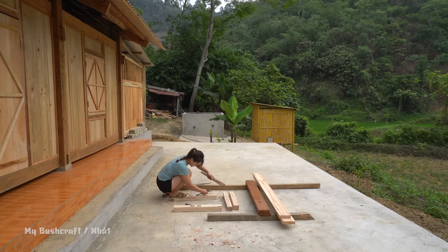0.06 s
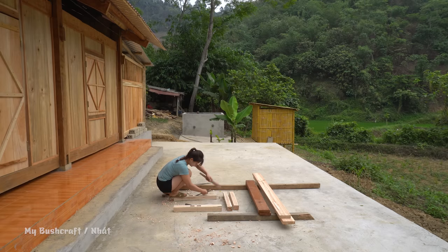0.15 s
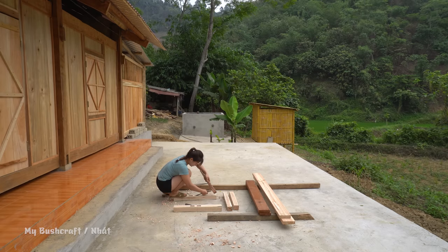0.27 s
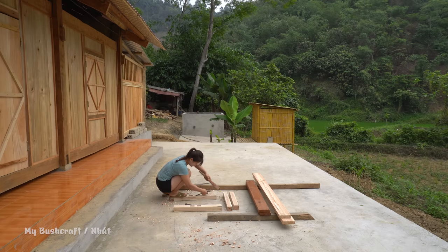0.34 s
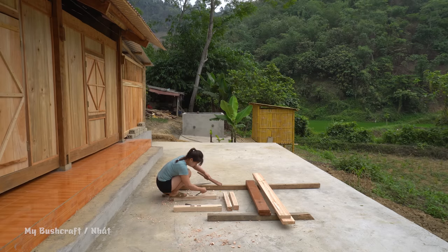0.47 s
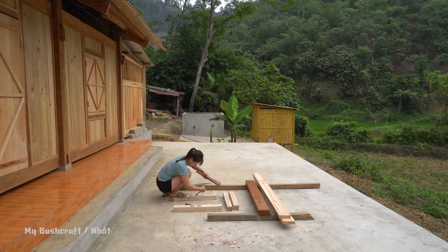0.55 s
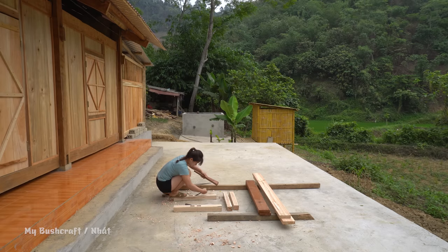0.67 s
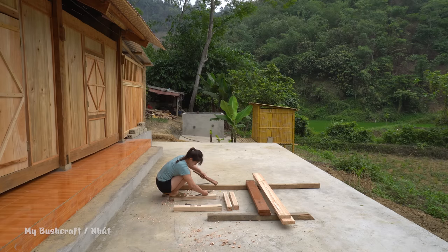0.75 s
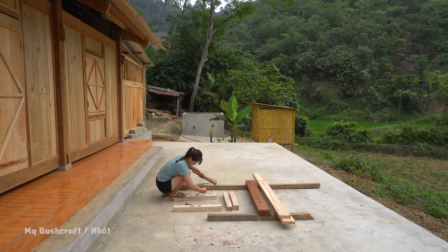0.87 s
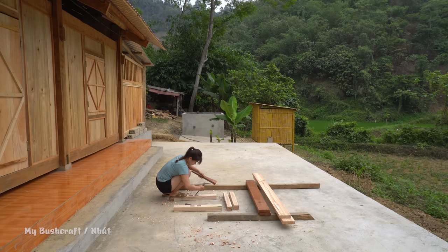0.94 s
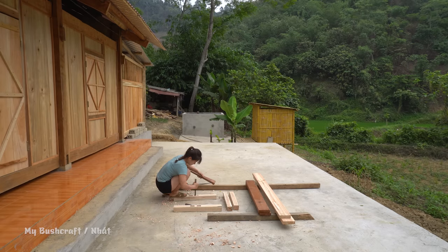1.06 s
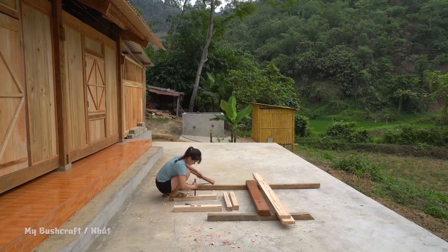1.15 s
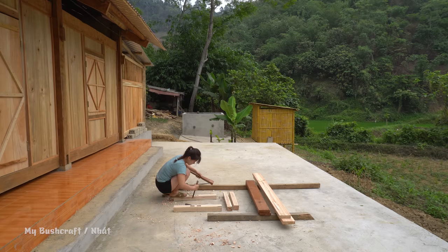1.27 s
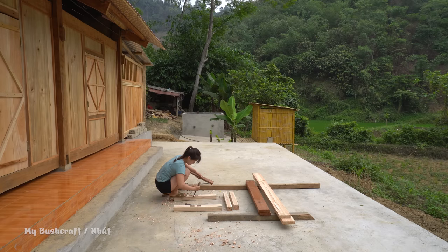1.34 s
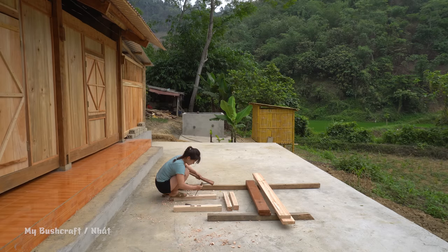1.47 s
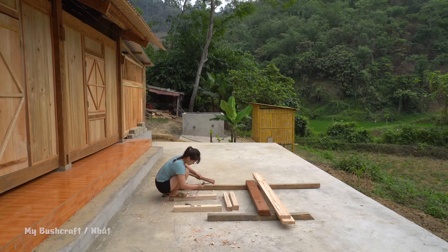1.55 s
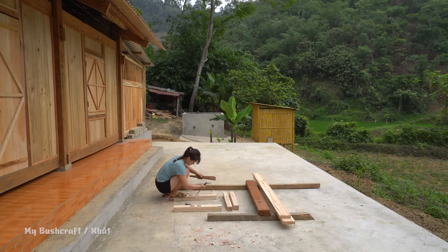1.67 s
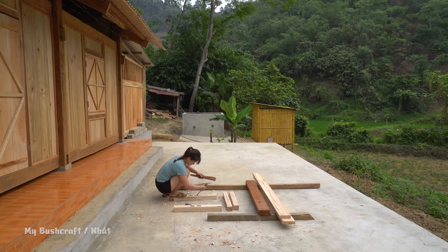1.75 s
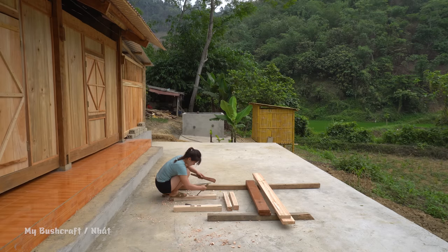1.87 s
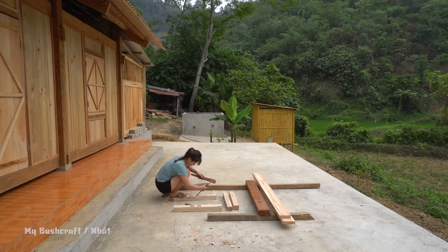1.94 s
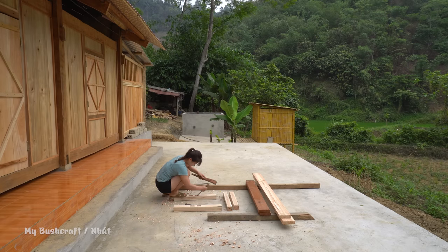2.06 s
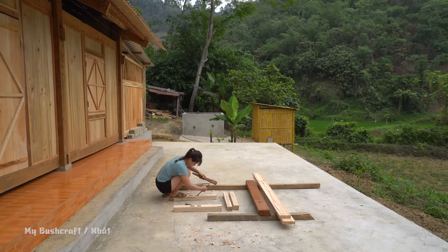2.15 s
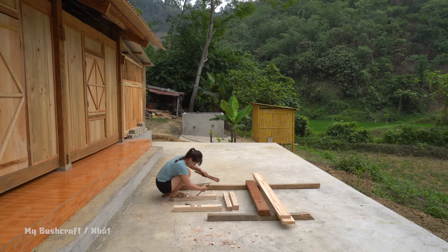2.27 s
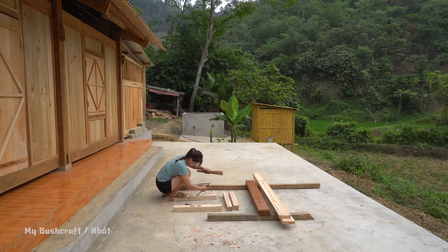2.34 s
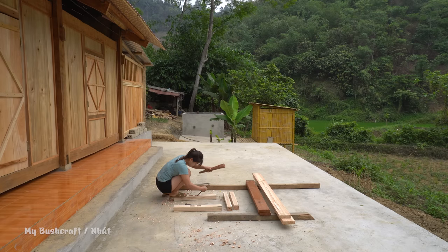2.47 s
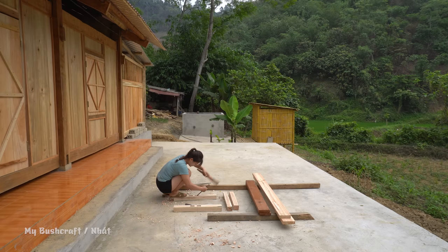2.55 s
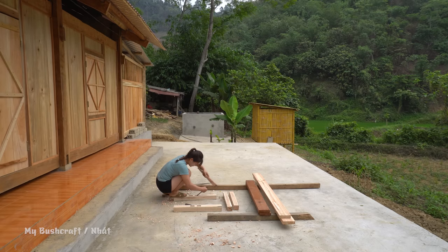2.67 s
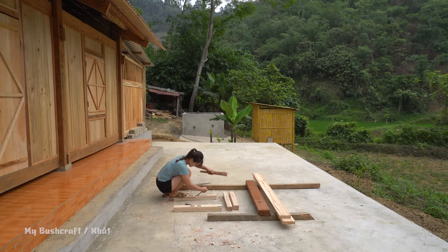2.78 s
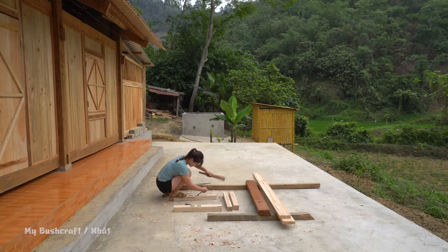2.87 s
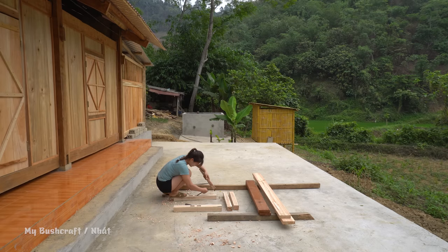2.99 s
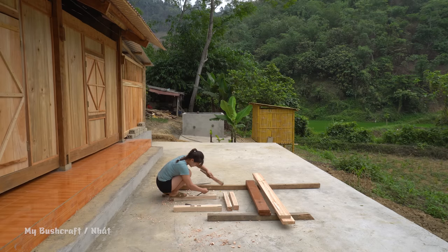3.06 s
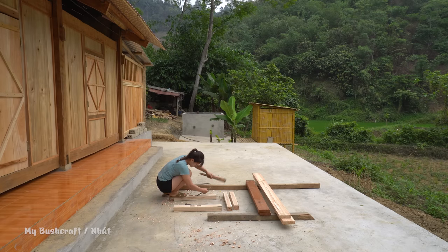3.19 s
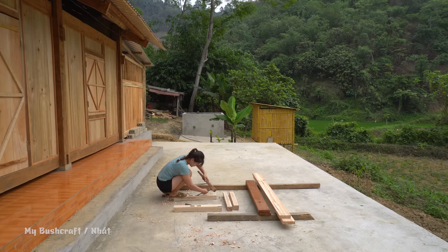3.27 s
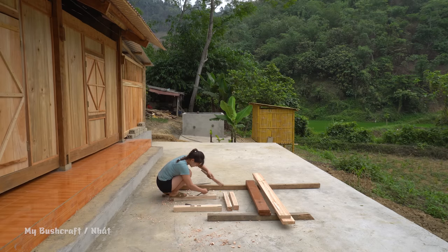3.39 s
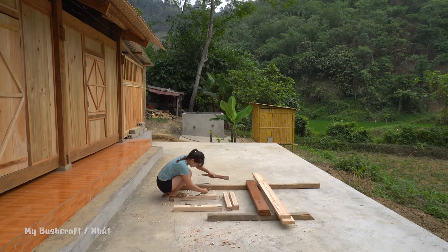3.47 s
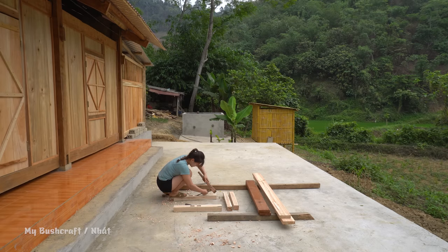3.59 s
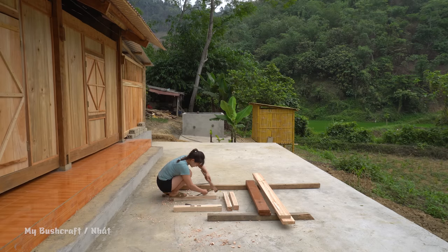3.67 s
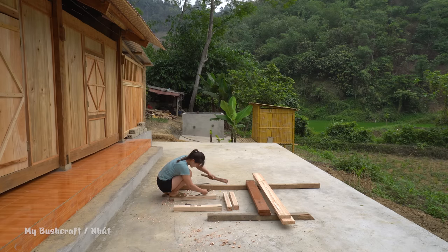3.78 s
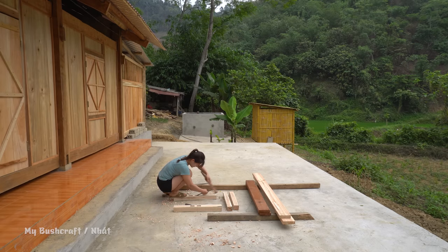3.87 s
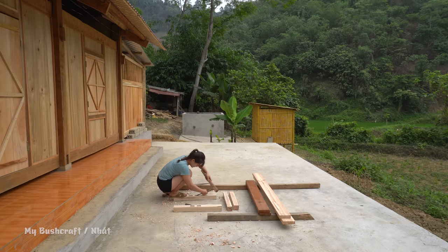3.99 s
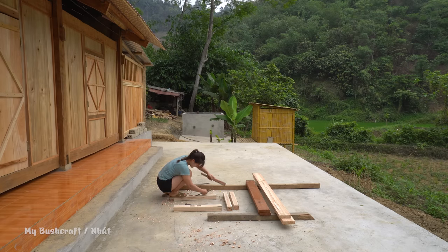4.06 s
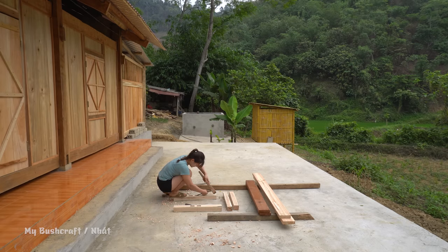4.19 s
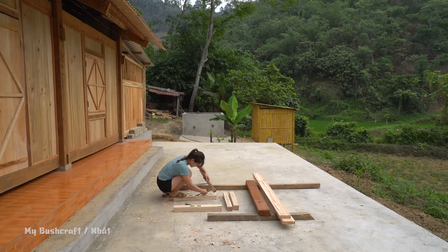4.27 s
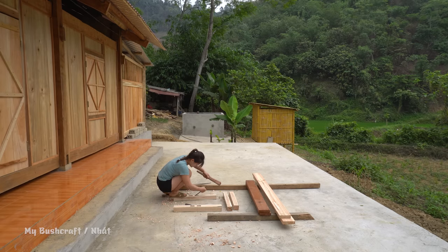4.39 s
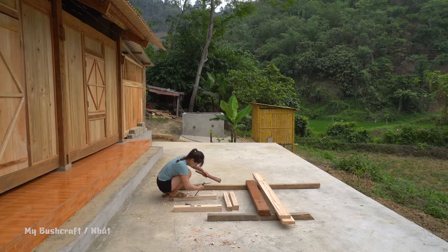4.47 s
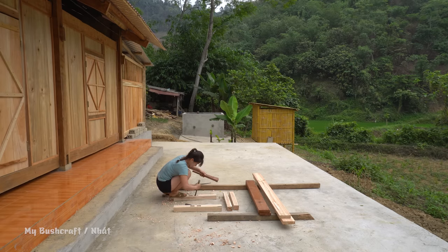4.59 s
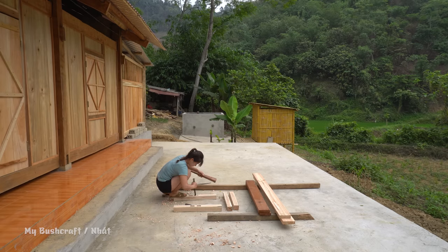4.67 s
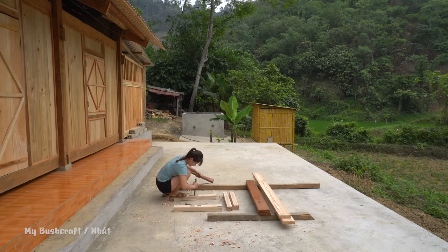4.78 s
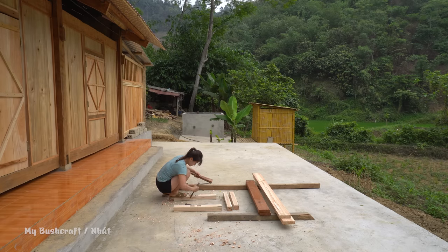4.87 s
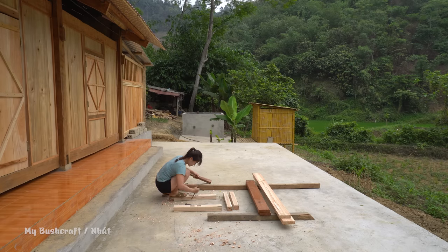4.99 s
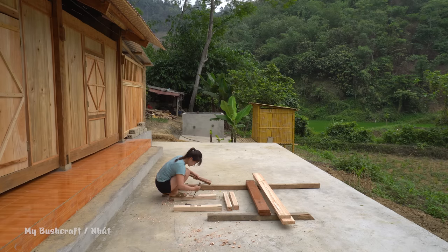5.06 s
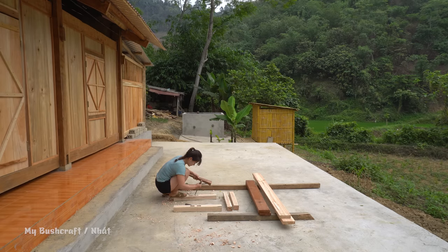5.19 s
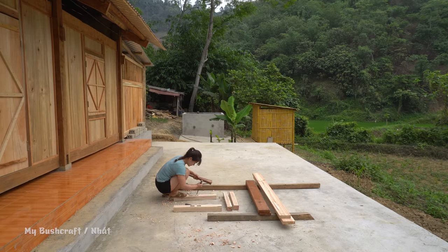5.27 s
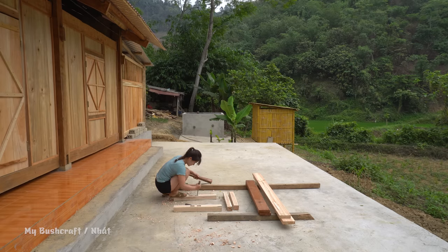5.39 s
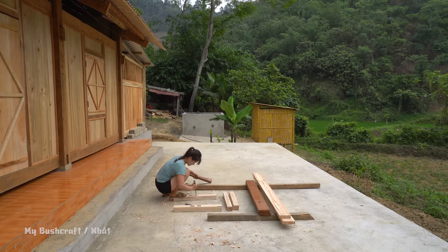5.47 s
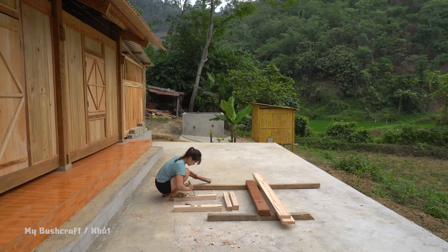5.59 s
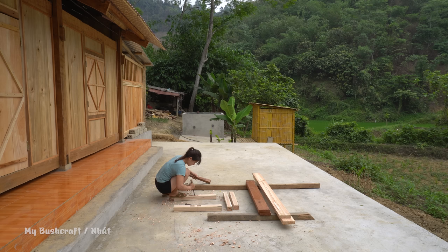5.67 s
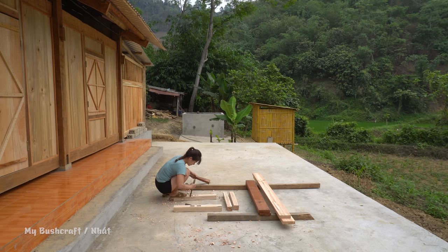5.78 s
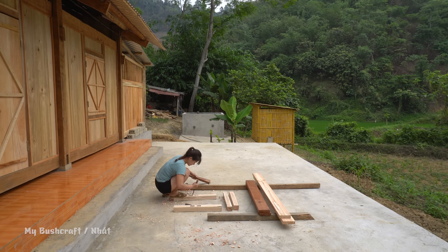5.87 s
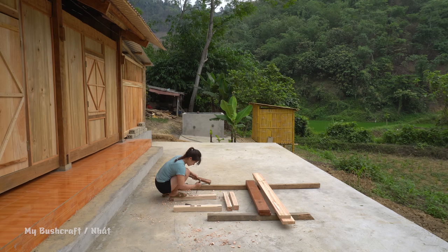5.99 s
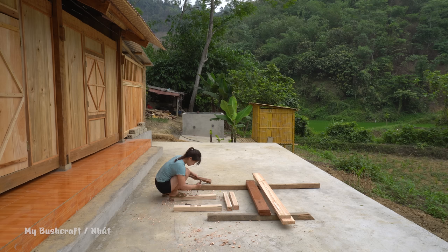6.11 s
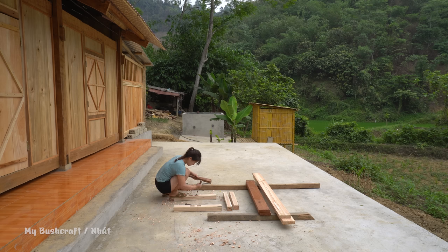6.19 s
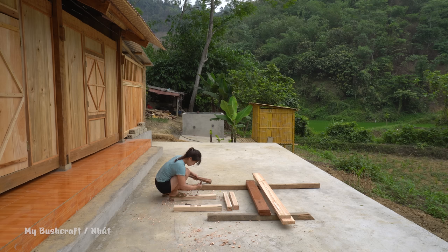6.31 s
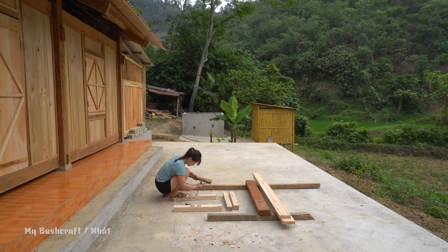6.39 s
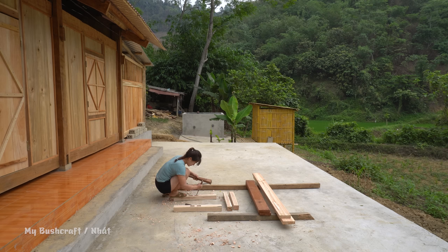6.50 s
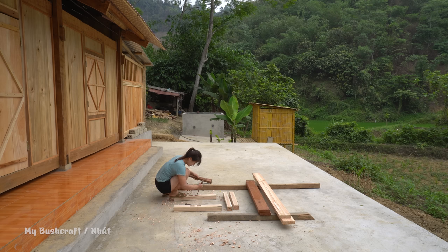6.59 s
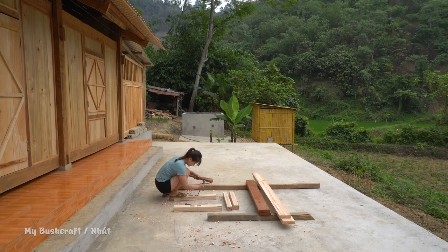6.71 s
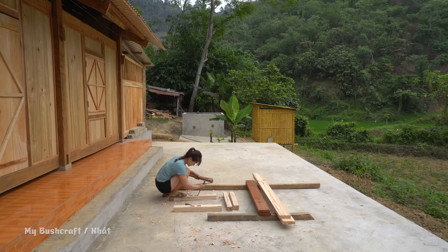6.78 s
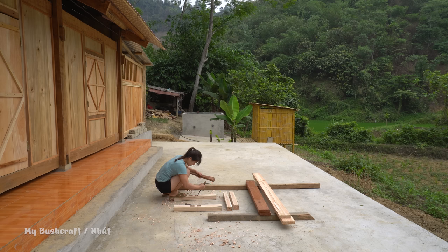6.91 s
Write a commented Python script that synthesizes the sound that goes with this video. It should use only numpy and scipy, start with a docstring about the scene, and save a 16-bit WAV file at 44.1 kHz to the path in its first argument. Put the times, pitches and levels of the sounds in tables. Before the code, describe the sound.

Sharp woody chisel blows, bright and short with little low thump, ring out beside a timber house. A pair comes first, then after more than two seconds an even run of six, each with a quick wall slap and soft valley tail. Between and after are tiny dry scrapes and dull taps of wood. A high cicada rasp, insect chorus, light breeze and thin bird calls fill the open air, picked up in stereo from a distance.

```python
"""A wooden mallet drives a chisel into a beam on a concrete yard beside a timber house.
Each blow excites decaying modes and a noisy crack; house front, far wall and wooded valley answer.
A cicada's click trains ring its drum over a distant insect chorus and rumbling breeze of shaped noise.
Soft knocks and scrapes are filtered bursts; small birds call in gliding, quavering sines."""
import sys
import numpy as np
from scipy import signal
from scipy.fft import rfft, irfft
from scipy.io import wavfile
from scipy.ndimage import uniform_filter1d

SR = 44100
rng = np.random.default_rng(int(sys.argv[2]) if len(sys.argv) > 2 else 0)


def store_pcm(level_fs):
    """Save levels as 16-bit WAV."""
    pcm = np.round(np.clip(level_fs, -1, 1) * 32767).astype(np.int16)
    wavfile.write(sys.argv[1], SR, np.atleast_2d(pcm).T)


N = 306054
TIME = np.arange(N) / SR  # seconds

# All levels in dB are relative; spectra give shape only.
# Mallet blows. Each row: start in seconds, force in dB, boost of the low modes in dB,
# crack level in dB, factor on the modal frequencies.
BLOWS = [(-.0145, -0.5, 0.5, -1, 0.98), (0.286, -2.5, -3, 4.5, 0.94), (2.672, -2.3, -4.5, 4, 0.92),
         (3.0201, -2, 4, 5, 0.99), (3.3418, -.5, -0.5, -1.5, 0.94), (3.6663, -1.5, 1, 3, 1.0),
         (3.9834, -1, -3.5, -0.5, 0.84), (4.2732, -0.5, -0.5, -1.5, 1)]
# Modes of beam, chisel and mallet. Each row: nominal frequency in Hz, level in dB, 60 dB decay time in s.
MODES = [(171, -21, 0.017), (372, -19.5, 0.025), (440, -11.5, 0.024), (492, -4.5, 0.027), (600, -8, 0.027),
         (706, -6.5, 0.024), (840, -7, 0.03), (1140, -3.5, 0.017), (1269, -0.5, 0.0032), (1453, -0.5, 0.01),
         (1612, -4, 0.054), (1817, -1.5, 0.018), (2082, -1.5, 0.022), (2396, -4, 0.0021),
         (2592, -0.5, 0.0099), (3076, 0.5, 0.014), (3900, -8, 0.011), (4540, -34, .006),
         (5780, -22.5, .006)]
# Spectrum of the edge splitting fibres. Each row: frequency in Hz, density in dB per Hz.
CRACK = [(250, -44), (900, 6.5), (2400, 5.5), (3500, -7), (5500, -1.5), (7300, -8), (8500, -6),
         (11000, -15), (16000, -17)]
# Left-right likeness of direct sound. Each row: frequency in Hz, likeness from 0 to 1.
DIRECT_LIKENESS = [(100, .99), (600, 1), (1400, 0.68), (3000, 1), (7000, 0.52), (15000, 0.7)]
CUT_S = 0.0052  # how long the edge travels in one blow
THUMP_HZ = 706  # the beam's thump lies below this frequency

# Single reflections from slab and house front. Each row: delay in s, left level in dB, right level in dB.
REFLECTIONS = [(.0093, -22, -20), (0.0216, -24, -19), (.0245, -25, -36), (0.038, -40, -24)]
# Frequency response of the far wall's echo. Each row: frequency in Hz, gain in dB.
WALL = [(200, -5.5), (1400, -46), (2000, -10.5), (2600, -4.5), (3500, -16.5), (6000, -11.5), (15000, -17)]
# Frequency response of the valley's tail. Each row: frequency in Hz, gain in dB.
VALLEY = [(150, -17), (300, 2), (500, -3.5), (900, -3), (1600, -6), (3000, -16.5), (6000, -22), (15000, 7)]
# Decay of the valley's tail. Each row: frequency in Hz, 60 dB decay time in s.
VALLEY_T60 = [(150, 0.9), (500, 0.88), (1500, 0.79), (4000, 0.36), (12000, 0.11)]

# Clicks of the cicada's ribs buckling in one muscle stroke.
# Each row: delay in ms, level in dB, left minus right in dB.
RIBS = [(0.839, -2.1, -0.9), (2.167, -8.9, -0.0), (4.354, -6.0, -2.0), (5.577, -3.4, -1.3),
        (6.918, -17.9, 5.6), (9.067, -6.1, -1.5), (10.299, -21.2, -4.7), (11.958, -22.7, 4.7),
        (13.825, -17.6, -4.5)]
# Resonance of the cicada's drum and belly. Each row: frequency in Hz, gain in dB.
TYMBAL = [(1500.0, -46.5), (2200.0, -36.5), (2550.0, -9), (2800.0, 1.5), (3100.0, -6.5), (3400.0, 4.5),
          (3700.0, -7), (4100.0, -15), (4800.0, -21), (5600.0, -32), (8000.0, -57.5)]
FIRST_STROKE = 0.372  # wait before the first stroke, as a share of a cycle
# the cicada tires: starting rate in strokes a second, rate lost in the first second, power of time
STROKE_HZ, SAG_HZ, SAG_POWER = 47.239, 0.02126, 1.5
# its song holds, then fades: level before panning, hold, fall, fade length, left minus right
SONG_DB, SONG_HOLD_S, SONG_FALL_DB, SONG_FADE_S, SONG_PAN_DB = -32.5, 1, 3.5, 5.1, -2.6

# Distant insects, low band. Each row: frequency in Hz, density in dB per Hz.
CHORUS = [(700, -35), (950, -24), (1080, -10.5), (1200, -1), (1330, -1.5), (1500, -11), (1750, -14),
          (2100, -20.5), (2600, -10), (4000, -39.5)]
CHORUS_DB, CHORUS_FADE_DB_PER_S = -39, 0.2151
CHORUS_FLUTTER_DB, CHORUS_FLUTTER_HZ = 1.0, 14  # rms depth and bandwidth
# Distant insects, shrill band. Each row: frequency in Hz, density in dB per Hz.
SHRILL = [(1900, -21), (2300, -14), (2800, 4), (3400, 0), (3800, -8.5), (4800, -11.5), (5600, -29),
          (8000, -50)]
SHRILL_DB, SHRILL_FADE_DB_PER_S = -38.5, 0.23
# Air and leaves. Each row: frequency in Hz, density in dB per Hz.
AIR = [(30, -19), (150, 2.5), (300, -3.5), (700, -2.5), (2000, -16.5), (5500, -3), (6700, -5.5), (8200, -3),
       (10000, -9), (13000, -9.5), (16000, -28)]
# Breeze. Each row: frequency in Hz, density in dB per Hz.
BREEZE = [(10, -12), (22, -0.5), (34, -4), (55, -7.5), (100, -10), (150, -16), (230, -29.5), (500, -46.5)]
BREEZE_DB, BREEZE_FADE_DB_PER_S = -48, 0.49
LULL_S, LULL_WIDTH_S, LULL_DB = 4.24, 0.54, 6.5  # one lull: middle, half width, depth
# Left-right likeness of scattered sound. Each row: frequency in Hz, likeness from 0 to 1.
LIKENESS = [(30, 1), (150, 0.91), (500, 0.73), (1300, 0.46), (3000, 0.37), (15000, 0.35)]

# Chisel and beam being shifted. Each row: start in seconds, dull knock in dB, scrape in dB,
# scrape decay in s.
NUDGES = [(1.128, -30.5, -70, .004), (1.261, -36, -41.5, .008), (1.422, -52, -34.5, 0.0057),
          (1.442, -66, -43.5, 0.055), (2.089, -37.5, -70, .004), (4.589, -70, -37, 0.0039),
          (4.828, -51, -43, .005), (4.892, -49, -29, 0.0064), (5.447, -37.5, -66, .004),
          (5.592, -40, -41, 0.01), (5.605, -39.5, -54, .005), (5.777, -45, -35, 0.0064),
          (6.321, -44, -62, .004)]
# Response of a knock. Each row: frequency in Hz, gain in dB.
KNOCK = [(50, -17), (200, -4), (430, -1), (620, -7), (820, -6.5), (1100, -22), (4000, -55)]
# Spectrum of a scrape. Each row: frequency in Hz, density in dB per Hz.
SCRAPE = [(300, -10), (1500, -17), (5000, -1.5), (9000, -1), (15500, -3.5)]

# Two-note calls of the small bird. Each row: start in seconds, flick in dB, slur in dB,
# slur length in s, reference pitch of the slur in Hz.
CALLS_HIGH = [(1.489, -38.5, -42, .056, 6360), (1.836, -38, -42, 0.06, 6540),
              (2.213, -36.5, -39.5, 0.058, 6500), (4.622, -51, -42, .05, 6300),
              (6.162, -41.5, -43.5, .055, 6200), (6.52, -40.5, -44, 0.07, 6300),
              (6.877, -37, -44, .06, 6300)]
FLICK_S, FLICK_HZ = 0.023, (6350, 5000, 3800)  # length; falling pitch at start, middle and end
SLUR_WAIT_S = 0.111  # counted from the start of the flick
# The slur arches and falls. Its entries: start, middle and end pitch as shares of the reference.
SLUR_SHAPE = (0.91, 0.96, 0.62)
# Soft far hoots. Each row: start in seconds, length in s, reference pitch in Hz, level in dB.
HOOTS = [(1.784, 0.1, 600, -59), (2.081, 0.052, 787, -38.5)]
# A hoot sags. Its entries: start, middle and end pitch as shares of the reference.
HOOT_SHAPE = (0.95, 0.94, 0.93)
# Short harsh chucks of a third bird. Each row: start in seconds, reference pitch in Hz, level in dB.
CHUCKS = [(1.612, 2050, -44.5), (2.192, 1930, -42), (6.767, 1885, -43.5)]
CHUCK_S, CHUCK_SHAPE = 0.045, (0.88, 0.96, 0.85)  # length; start, middle and end pitch as shares

EDGE_HZ = 15950  # upper band limit


def amp(db):
    """Amplitude ratio of a level in dB."""
    return 10 ** (np.asarray(db) / 20)


def unit(x):
    """Normalization to an rms of 1."""
    return x / np.sqrt(np.mean(x ** 2) + 1e-20)


def read(points, hz):
    """Interpolation of a curve along a logarithmic frequency axis."""
    f, value = np.transpose(points)
    return np.interp(np.log(hz + 1), np.log(f), value)


def pan(db):
    """Level difference between channels: left minus right in dB, shared equally."""
    return amp(np.array([db / 2, -db / 2]).reshape(2, -1))


def add(mix, s, sound):
    """Superposition of a sound at s seconds, cut at the edges of the mix."""
    start = round(s * SR)
    part = mix[:, max(start, 0):max(start + sound.shape[-1], 0)]
    part += sound[..., max(-start, 0):][..., :part.shape[-1]]


def convolve(x, response):
    """Linear system: convolution with an impulse response, kept to the input's length."""
    full = signal.fftconvolve(np.atleast_2d(x), np.atleast_2d(response), axes=1)
    return full[:, :x.shape[-1]]


def colour(x, points, size=4096):
    """Minimum-phase filter: the Hilbert transform of the log gain supplies the phase."""
    log_gain = np.log(amp(read(points, abs(np.fft.fftfreq(size, 1 / SR)))))
    spectrum = np.exp(np.conj(signal.hilbert(log_gain)))
    return convolve(x, np.fft.ifft(spectrum).real[:size // 2])


def noise(points, size=N, likeness=LIKENESS):
    """Partial coherence: shaped noise whose channels share a frequency-dependent part."""
    hz = np.fft.rfftfreq(size, 1 / SR)
    left, other = rfft(rng.standard_normal((2, size)))
    same = np.clip(read(likeness, hz), -1, 1)
    right = same * left + np.sqrt(1 - same ** 2) * other
    return unit(irfft(np.array([left, right]) * amp(read(points, hz)), size))


def drift(rate_hz):
    """Low-pass random process: wandering of rms 1 with a Gaussian bandwidth."""
    hz = np.fft.rfftfreq(N, 1 / SR)
    return unit(irfft(rfft(rng.standard_normal(N)) * np.exp(-(hz / rate_hz) ** 2), N))


def tail(t60_points, onset, size=32768):
    """Diffuse reverberation: scattered reflections whose bands decay at their own speeds."""
    hz, t, z = signal.stft(noise([(20, 0), (20000, 0)], size=size), SR, nperseg=256)
    decay_db = -60 * t / read(t60_points, hz)[:, None]
    ring = signal.istft(z * amp(decay_db), SR, nperseg=256)[1]
    ring = ring * (1 - np.exp(-(np.arange(ring.shape[1]) / SR / onset) ** 2))
    return ring / np.linalg.norm(ring[0])  # the left channel has energy 1


def blow(thump_db, crack_db, pitch, size=32768):
    """Modal excitation: the edge drives the wood's modes while it cuts, and cracks through the fibres."""
    rise_s, crack_rise_s, crack_decay_s = 0.00036, 0.0002, 0.0033
    ring_db, bite_db = -19.0, -13
    spread, scatter = 0.24, 0.2
    t = np.arange(size) / SR
    hz, db, t60 = np.transpose(MODES)[:, :, None]
    start, apart, uneven, detune = rng.standard_normal((4, len(MODES), 1))
    db = db + ring_db + thump_db / (1 + (hz / THUMP_HZ) ** 4) + 0.52 * uneven
    # each mode is held during the cut, then dies away
    envelope = amp(db - 60 * np.maximum(t - CUT_S, 0) / t60) * (1 - np.exp(-(t / rise_s) ** 2))
    # neighbouring modes swing in opposite directions; a random scatter of starting phase grows with frequency
    start = np.arange(len(MODES))[:, None] / 2 + scatter * start * hz / THUMP_HZ
    # each mode's pitch varies a little at random from blow to blow
    turns = hz * pitch * (1 + 0.017 * detune) * t + start
    # higher modes reach the two microphones less in step
    offset = spread * apart * hz / 2500
    ring = np.array([(envelope * np.sin(2 * np.pi * turns + side * offset)).sum(0) for side in (1, -1)])
    crack = noise(CRACK, size=size, likeness=DIRECT_LIKENESS)
    crack = crack * np.exp(-t / crack_decay_s) * (1 - np.exp(-t / crack_rise_s))
    return ring + amp(bite_db + crack_db) * crack * pan(2.6)


def yard(x, wall_delay_s=0.0611, porch_db=-15, valley_db=-11):
    """Early and late reflections: near echoes, a wash under the eaves, one wall slap, the valley's tail."""
    out = x.copy()
    for delay, left_db, right_db in REFLECTIONS:
        add(out, delay, x * amp([[left_db], [right_db]]))
    add(out, wall_delay_s, colour(x, WALL))
    porch_t60 = [(300, 0.08), (1500, 0.11), (3000, 0.044), (8000, 0.047)]
    # the porch and the valley are each driven by the blow itself
    out += amp(porch_db) * convolve(x, tail(porch_t60, onset=0.016))
    valley = colour(convolve(x, tail(VALLEY_T60, onset=0.018)), VALLEY)
    return out + amp(valley_db) * valley


def mallet():
    """Impact and response: every blow is followed by the yard's answer."""
    out = np.zeros((2, N))
    for s, force_db, thump_db, crack_db, pitch in BLOWS:
        add(out, s, amp(force_db) * yard(blow(thump_db, crack_db, pitch)))
    return out * pan(0.76)


def cicada(flutter_db=1.0, scatter_db=-18, lag_ms=0.023, waver_db=0.4):
    """Impulse-driven resonance: each muscle stroke buckles a row of ribs, and every rib rings the drum."""
    turns = np.cumsum(STROKE_HZ - SAG_HZ * TIME ** SAG_POWER) / SR - FIRST_STROKE
    strokes = np.interp(np.arange(int(turns[-1]) + 1), turns, TIME)
    ms, db, side_db = np.transpose(RIBS)
    sizes = amp(db + flutter_db * rng.standard_normal((len(strokes), len(ms))))
    clicks, taps = np.zeros((2, N + SR)), np.arange(-8, 9)
    for channel, side in enumerate((0.5, -0.5)):
        place = (strokes[:, None] + (ms - side * lag_ms) / 1000)[..., None] * SR
        index = np.round(place).astype(int) + taps
        # a windowed sinc puts each click between samples
        pulse = np.sinc(index - place) * np.hanning(len(taps))
        np.add.at(clicks[channel], index, (sizes * amp(side * side_db))[..., None] * pulse)
    buzz = colour(clicks[:, :N], TYMBAL)
    buzz = buzz + amp(scatter_db) * convolve(buzz, tail([(2000, 0.36), (6000, 1.0)], onset=0.05))
    # the ground sends each microphone its own near reflection
    near = buzz.copy()
    add(buzz, 0.00265, near * amp([[-12], [-40]]))
    add(buzz, 0.00147, near * amp([[-40], [-12]]))
    level_db = SONG_DB - SONG_FALL_DB * np.clip((TIME - SONG_HOLD_S) / SONG_FADE_S, 0, 1)
    balanced = np.array([unit(c) for c in buzz])
    return balanced * amp(level_db + waver_db * drift(1)) * pan(SONG_PAN_DB)


def insect_chorus():
    """Incoherent summation: many far insects merge into two noise bands, the lower one fluttering."""
    flutter_db = CHORUS_FLUTTER_DB * drift(CHORUS_FLUTTER_HZ)
    low = noise(CHORUS) * amp(CHORUS_DB - CHORUS_FADE_DB_PER_S * TIME + flutter_db) * pan(-5.0)
    shrill = noise(SHRILL) * amp(SHRILL_DB - SHRILL_FADE_DB_PER_S * TIME) * pan(1.0)
    return low + shrill


def breeze(gust_db=3.0):
    """Turbulence noise: a low rumble that wanders in level, eases off and drops into one lull."""
    lull = np.exp(-((TIME - LULL_S) / LULL_WIDTH_S) ** 2)
    level_db = BREEZE_DB - BREEZE_FADE_DB_PER_S * TIME - LULL_DB * lull + gust_db * drift(4.2)
    return noise(BREEZE) * amp(level_db)


def leaves(air_db=-53):
    """Broadband noise: air and leaves hush with a wandering level."""
    return amp(air_db + 2.0 * drift(6.5)) * noise(AIR) * pan(2.4)


def handling(rattle=0.047, rattle_decay_s=0.0081, size=8192):
    """Contact and friction: soft knocks and dry scrapes as the chisel is levered and set again."""
    out, t = np.zeros((2, N)), np.arange(size) / SR
    for s, knock_db, scrape_db, decay in NUDGES:
        # one contact, then a brief rattle as the wood settles
        contact = (t == 0) + rattle * rng.standard_normal(size) * np.exp(-t / rattle_decay_s)
        knock = colour(contact, KNOCK)
        scrape = noise(SCRAPE, size=size) * np.exp(-t / decay) * (1 - np.exp(-t / 0.00023))
        add(out, s, 2 * amp(knock_db) * knock / abs(knock).max() + amp(scrape_db) * scrape)
    return out


def note(length, pitches_hz, quaver, swell_db, size=90):
    """Frequency modulation: a quavering sine bends through three pitches as its level rises or falls."""
    u = np.linspace(0, 1, int(length * SR))
    waver = unit(uniform_filter1d(rng.standard_normal(SR), size=size))[:len(u)]
    bend = np.polyval(np.polyfit([0, 0.5, 1], pitches_hz, 2), u)
    hz = bend * (1 + quaver * waver)
    tone = np.sin(2 * np.pi * np.cumsum(hz) / SR)
    return amp(swell_db * (u - 0.5)) * tone * signal.windows.tukey(len(u), 0.3)


def trees(x, direct_db, wet_db):
    """Multiple scattering: a call is heard directly and blurred by the trees."""
    blurred = convolve(x, tail([(700, 0.65), (6000, 0.29)], onset=0.00063))
    return amp(direct_db) * x + amp(wet_db) * blurred


def birds():
    """Gliding tones: a small bird repeats its flick and slur; farther off one hoots and another chucks."""
    high, hoots, chucks = np.zeros((3, 2, N))
    for s, flick_db, slur_db, length, reference_hz in CALLS_HIGH:
        flick = note(FLICK_S, FLICK_HZ, quaver=0.022, swell_db=12)
        slur = note(length, reference_hz * np.array(SLUR_SHAPE), quaver=0.016, swell_db=9)
        add(high, s, amp(flick_db) * flick)
        add(high, s + SLUR_WAIT_S, amp(slur_db) * slur)
    for s, length, hz, db in HOOTS:
        add(hoots, s, amp(db) * note(length, hz * np.array(HOOT_SHAPE), quaver=0.006, swell_db=-2.5))
    for s, hz, db in CHUCKS:
        add(chucks, s, amp(db) * note(CHUCK_S, hz * np.array(CHUCK_SHAPE), quaver=0.11, swell_db=3))
    out = trees(high, direct_db=-2, wet_db=-2.5)
    out += trees(hoots, direct_db=0.0, wet_db=-8)
    return out + trees(chucks, direct_db=2.5, wet_db=-1.5)


def scene():
    """Superposition of all sources."""
    return mallet() + cicada() + insect_chorus() + breeze() + leaves() + handling() + birds()


def record(dry, ceiling=1.0):
    """Soft saturation, then a band limit: the loudest peaks are rounded off before a low-pass filter."""
    rounded = dry / (1 + (dry / ceiling) ** 4) ** 0.25
    lowpass = signal.firwin(401, EDGE_HZ, window=("kaiser", 9), fs=SR)
    return signal.oaconvolve(rounded, lowpass[None], "same")


dry = scene()
out = record(dry)
store_pcm(out)
```